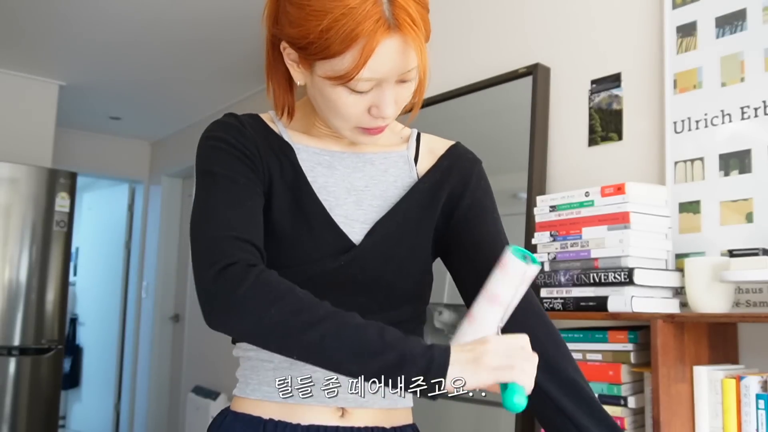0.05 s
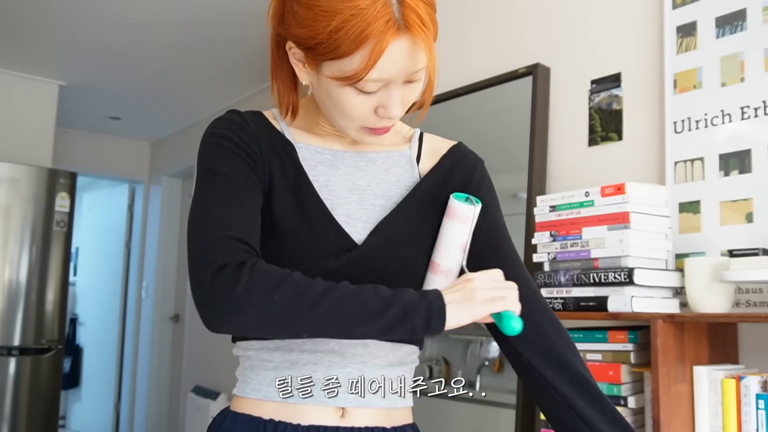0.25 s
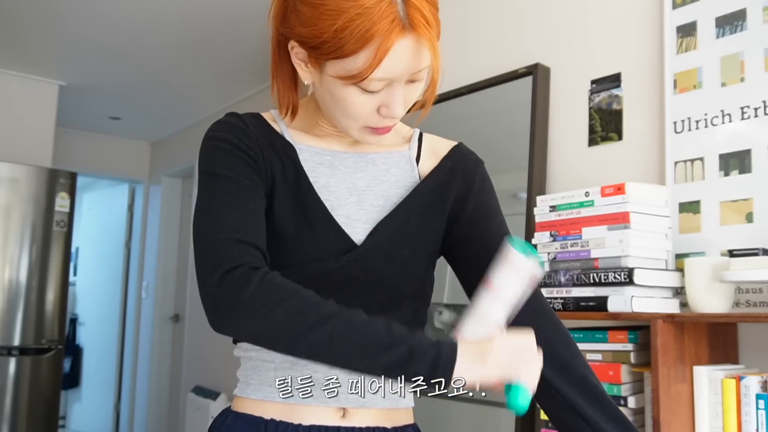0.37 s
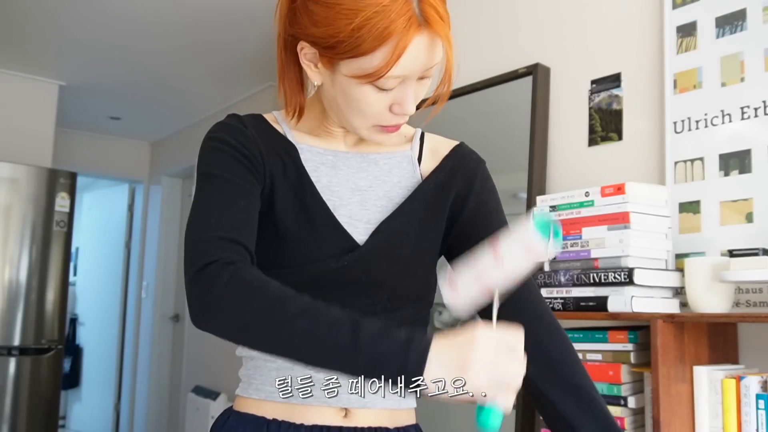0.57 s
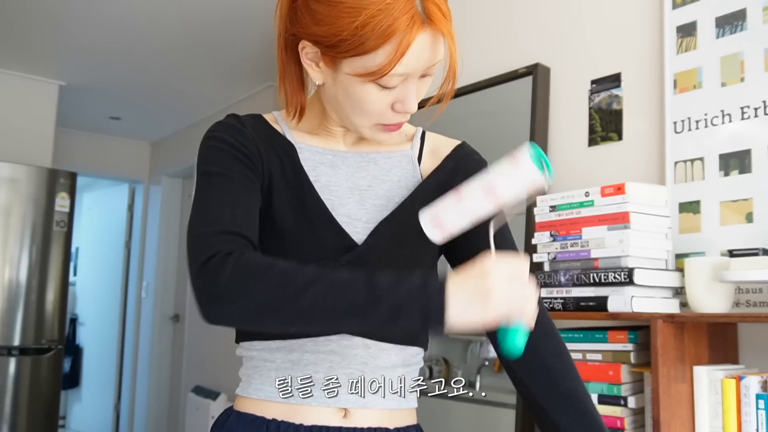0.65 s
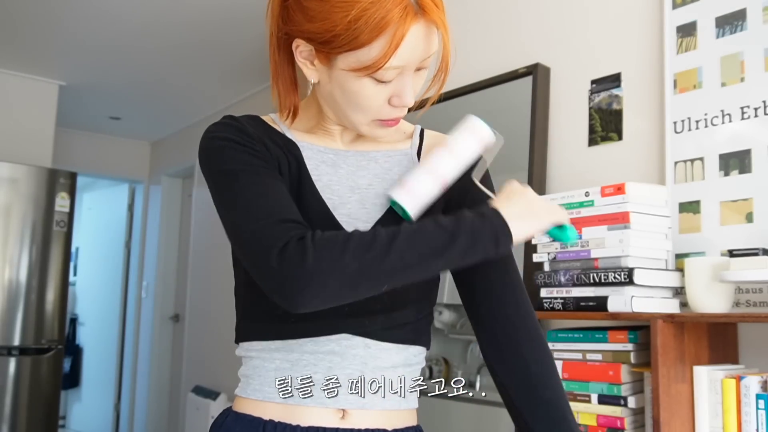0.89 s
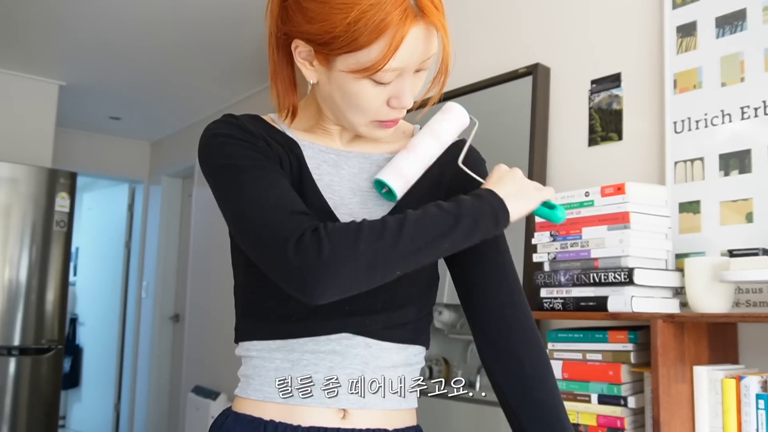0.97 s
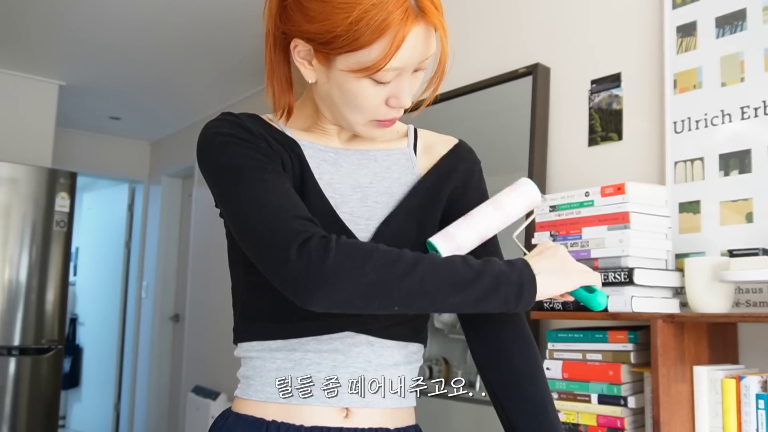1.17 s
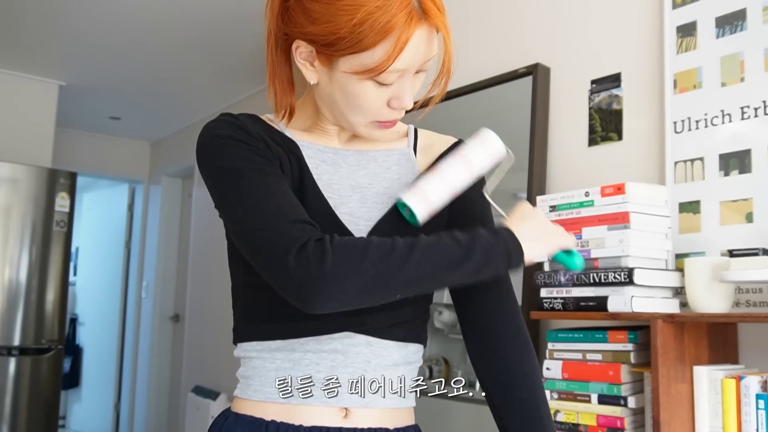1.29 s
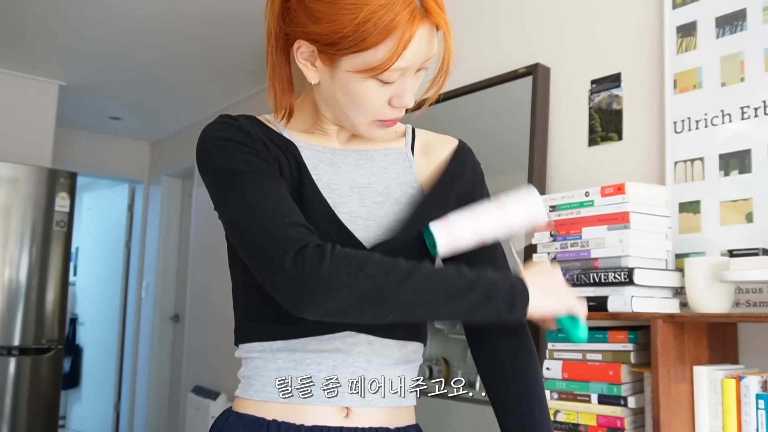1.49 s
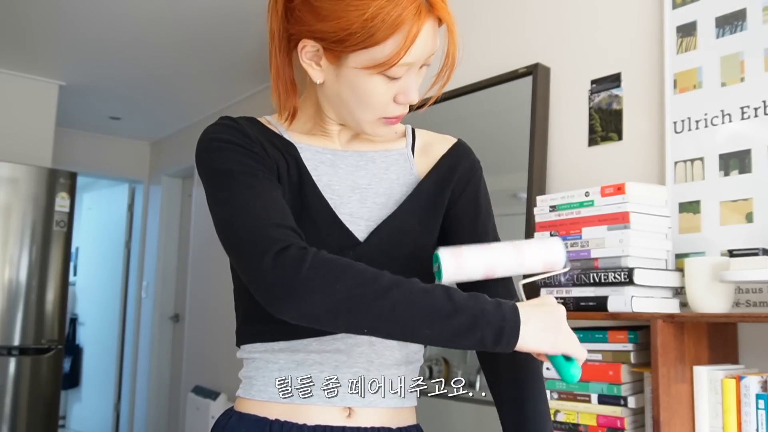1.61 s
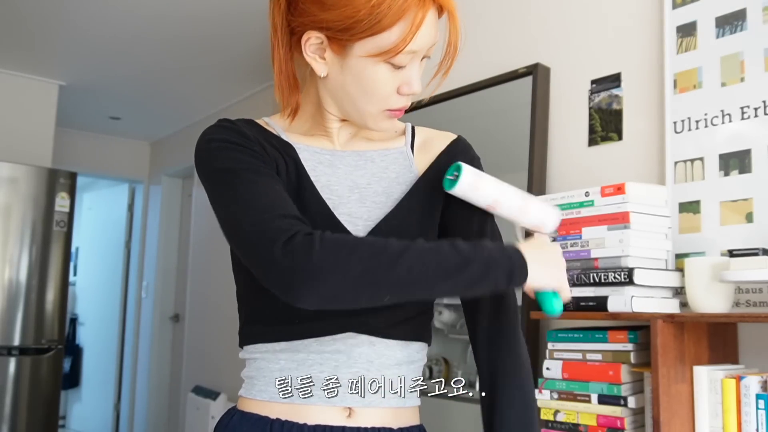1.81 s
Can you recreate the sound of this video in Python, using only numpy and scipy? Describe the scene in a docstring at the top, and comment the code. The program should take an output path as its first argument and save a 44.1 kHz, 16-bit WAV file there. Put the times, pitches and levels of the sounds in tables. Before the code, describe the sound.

A lint roller crackles across fabric in quick, swelling strokes, heard up close in a quiet room. Near the middle its plastic drum clicks, knocks sharply and rattles with high squeaks, then more strokes follow with lighter knocks.

```python
"""In a quiet room, a sticky lint roller is run over a sweater in short strokes.
The glue peels off the cloth in a fine, dense crackle. The hollow plastic drum squeaks on its axle,
knocks against the frame as it lands or lifts, clicks against its end stop,
and rattles while it spins free."""
import sys
import numpy as np
from scipy import signal
from scipy.fft import rfft, irfft
from scipy.io import wavfile
from scipy.ndimage import uniform_filter1d

SR = 44100
rng = np.random.default_rng(int(sys.argv[2]) if len(sys.argv) > 2 else 0)


def pcm_store(signal):
    """Save signal as 16-bit PCM."""
    levels = np.round(np.clip(np.atleast_2d(signal), -1, 1) * 32767)
    wavfile.write(sys.argv[1], SR, levels.astype(np.int16).T)


N = 81585
TIME = np.arange(N) / SR


def amp(db):
    """Turns decibels (dB) into a number to multiply by."""
    return 10 ** (np.asarray(db) / 20)


def unit(x):
    """Scales a sound so that its average strength (rms) is 1."""
    return x / np.sqrt(np.mean(x ** 2) + 1e-20)


def read(points, hz):
    """Reads between the rows of a (frequency, value) table, with octaves evenly spaced."""
    row_hz, value = np.transpose(points)
    return np.interp(np.log(hz + 1), np.log(row_hz + 1), value)


def add(mix, start_s, sound):
    """Adds a sound to the mix at a given time."""
    part = mix[max(round(start_s * SR), 0):][:len(sound)]
    part += sound[:len(part)]


def shelf(x, corner):
    """Rises smoothly from 0 below the corner to 1 above it."""
    return 1 - 1 / (1 + np.square(x / corner) ** 2)


def colour(x, db_at, size=2048):
    """Shapes the tone of a sound; db_at gives the relative level of each frequency."""
    log_gain = np.log(amp(db_at(abs(np.fft.fftfreq(size, 1 / SR)))))
    taps = np.fft.ifft(np.exp(np.conj(signal.hilbert(log_gain)))).real  # never rings ahead of a hit
    return signal.fftconvolve(x, taps / np.linalg.norm(taps))[:len(x)]


def wander(rate_hz):
    """A smooth random wobble, up to about the given rate."""
    keep_slow = 1 - shelf(np.fft.rfftfreq(N, 1 / SR), rate_hz)
    return unit(irfft(rfft(rng.standard_normal(N)) * keep_slow, N))


def clicks(per_s, spread_db):
    """Random clicks, mostly small and a few large."""
    size = amp(spread_db * np.minimum(rng.exponential(1, N), 4))
    return unit(size * rng.choice([-1, 1], N) * (rng.random(N) < per_s / SR))


def room_tone(level_db=-54.5, side_db=-10):
    """A faint steady hush, nearly the same on the left and right."""
    # Each row: frequency in Hz, relative level in dB.
    hush = [(15, -60), (25, -18.5), (107, -10), (152, -4.5), (193, -2.5), (313, -10), (1020, -13.5),
            (1140, -11.5), (1340, -12), (7500, -22), (8350, -23), (9050, -26), (15500, -33)]
    middle, side = (unit(colour(rng.standard_normal(N), lambda hz: read(hush, hz))) for _ in range(2))
    return amp(level_db) * (middle + amp(side_db) * np.array([side, -side]))


def room_echo(x, tail_db=-4.5, build_s=0.0053, size=22050):
    """Sound bounces off nearby surfaces, then dies away in a short blurred tail."""
    # Each row: delay of one bounce in seconds, level in dB.
    bounces = [(.0046, -24.5), (.0056, -20), (.0074, -13), (.0135, -15.5)]
    # Each row: frequency in Hz, seconds the tail takes to fade by 60 dB.
    fade_times = [(250, 0.25), (1700, 0.31), (4600, 0.28), (13000, 0.34)]
    hz, t, noise = signal.stft(rng.standard_normal(size), SR, nperseg=256)
    tail = signal.istft(noise * amp(-60 * t / read(fade_times, hz)[:, None]), SR)[1][:size]
    tail *= np.minimum(np.arange(size) / SR / build_s, 1)
    response = amp(tail_db) * tail / np.linalg.norm(tail)
    for delay, db in bounces:
        add(response, delay, amp([db]))
    return signal.fftconvolve(x, response)[:N]


def spread(x, width, scatter_s=0.027, size=6000):
    """Scattered sound reaches the left and right differently, most of all in the treble."""
    hz = np.fft.rfftfreq(size, 1 / SR)
    scatter = rng.standard_normal(size) * np.exp(-np.arange(size) / SR / scatter_s)
    scatter = irfft(rfft(scatter / np.linalg.norm(scatter)) * amp(read(width, hz)))
    side = signal.fftconvolve(x, scatter)[:N]
    return np.array([x + side, x - side]) * amp([[.25], [-.25]])  # a touch louder on the left


def drum_rattle(level_db=-2, spin_s=0.16):
    """The hollow drum chatters on its axle as it runs down."""
    # Each row: start of a spin in seconds, relative level in dB, steady fade in dB per second.
    spins = [(.474, -41, 98), (.786, -33, 123), (1.348, -42, 106), (0.75, -54, 6), (1.54, -52.5, 83)]
    # Each row: frequency in Hz, relative level of the chatter in dB.
    tone = [(20, -59), (70, -32), (160, -14.5), (300, -13), (700, -10), (1100, -0.5), (1450, 1),
            (1850, 3.5), (2500, -7.5), (3200, -12), (5200, -11.5), (6200, -11.5), (9000, -15), (15500, -37)]
    level = np.zeros(N)
    for start, db, fade in spins:
        age = abs(TIME - start)
        run_down = 1 - shelf(age, spin_s)  # an extra fade that ends the spin
        level += (TIME > start) * amp(db - fade * age) * run_down
    chatter = clicks(per_s=900, spread_db=3) * level
    return amp(level_db) * colour(chatter, lambda hz: read(tone, hz))


def axle_squeaks(edge_s=0.0077, waver_hz=20.1, rough_db=2):
    """The axle sticks and slips, which makes groups of its tones sing in short, unsteady bursts."""
    # Each row: start in seconds, length in seconds, level in dB, which group of tones sings.
    bursts = [(0.444, 0.041, -44.5, "low"), (0.48, 0.053, -38.5, "low"), (0.545, 0.026, -46, "low"),
              (0.573, 0.033, -52, "low"), (0.695, 0.038, -44, "low"), (0.764, 0.055, -32, "low"),
              (0.839, 0.041, -37, "low"), (1.022, 0.034, -50.5, "low"), (1.057, 0.037, -48.5, "low"),
              (1.109, 0.054, -46, "low"), (1.156, 0.038, -35.5, "low"), (1.215, 0.038, -52, "low"),
              (1.405, 0.028, -46.5, "low"), (1.461, 0.067, -52, "low"), (0.391, 0.13, -47.5, "high"),
              (0.501, .012, -38, "high"), (0.52, 0.031, -46, "high"), (0.542, 0.1, -57, "high"),
              (0.675, 0.042, -45.5, "high"), (0.764, 0.052, -38, "high"), (0.831, 0.06, -51, "high"),
              (0.986, 0.043, -51.5, "high"), (1.042, 0.1, -48.5, "high"), (1.131, 0.051, -42, "high"),
              (1.173, 0.074, -59, "high"), (1.399, 0.049, -48, "high"), (1.703, .025, -53.5, "high"),
              (1.724, 0.065, -65, "high"), (1.388, 0.043, -45, "loose")]
    # The axle's three groups of tones. Each row: pitch in Hz, relative level in dB.
    low = [(4534, -13), (4582, 0), (4662, -14), (11585, -25), (13300, -28)]
    high = [(8020, -4), (8187, 0), (8110, -11), (13440, -20), (15700, -28)]
    loose = [(3890, 0), (6713, -5), (11550, -16), (13460, -18)]
    out = np.zeros(N)
    for name, tones in (("low", low), ("high", high), ("loose", loose)):
        level = sum(amp(db) * np.clip(np.minimum(TIME - start, start + length - TIME) / edge_s, 0, 1)
                    for start, length, db, group in bursts if group == name)
        squeal = np.zeros(N)
        for hz, db in tones:
            pitch = hz + waver_hz * wander(rate_hz=84)
            squeal += amp(db) * np.sin(2 * np.pi * np.cumsum(pitch) / SR)
        out += level * unit(squeal * amp(rough_db * wander(rate_hz=170)))
    return out


def plastic_hits(hits, tone, ring_tones, crack_db, ring_db, crack_s=0.0017, size=6000):
    """Plastic hits plastic: a sharp crack and a short ring."""
    bass_hz, treble_hz = 1300, 3350
    t, crack_hz = np.arange(size) / SR, np.fft.rfftfreq(size, 1 / SR)
    ring = sum(amp(db - 60 * t / fade_s) * np.sin(2 * np.pi * hz * t) for hz, db, fade_s in ring_tones)
    out = np.zeros(N)
    for start, db, bass_db, treble_db in hits:
        burst = rng.standard_normal(size) * np.exp(-t / crack_s)
        crack = (t == 0) + amp(crack_db) * burst / np.linalg.norm(burst)
        # Even out the chance peaks and dips in the crack's tone.
        uneven_db = 10 * np.log10(uniform_filter1d(abs(rfft(crack)) ** 2, size=60))
        crack = colour(crack, lambda hz: -np.interp(hz, crack_hz, uneven_db))
        hit = colour(unit(crack) + amp(ring_db) * unit(ring),
                     lambda hz: read(tone, hz) + bass_db * (1 - shelf(hz, bass_hz))
                     + treble_db * shelf(hz, treble_hz))
        add(out, start, amp(db) * hit / np.linalg.norm(hit))
    return out


def drum_knocks():
    """The hollow drum knocks against the frame as it lands or lifts."""
    # Each row: start in seconds, strength in dB, bass boost in dB, treble boost in dB.
    knocks = [(.228, -42, 7, -12), (.325, -16.5, -8, -19), (.458, -28, 10, -9.5), (.473, -10, 0, 0.5),
              (.501, -17.5, -13, -11), (.585, -21.5, -1, -4), (.7766, 3, 4.5, 7), (.782, -26, -10, 10),
              (1.3455, -11.5, 5.5, 0)]
    # Each row: frequency in Hz, relative level of a knock in dB.
    tone = [(20, -55), (80, -41), (160, -4), (300, -6), (550, 0.5), (1050, 1), (1900, 3.5), (3100, 3),
            (4000, -3), (5300, -6), (6200, -1.5), (7200, -10.5), (10000, -12.5), (15500, -31)]
    # How the drum rings. Each row: pitch in Hz, relative level in dB, seconds to fade by 60 dB.
    drum_ring = [(498, -11.5, 0.096), (800, -5, 0.028), (1070, -13, 0.047), (1290, -2, 0.066),
                 (1876, 0.5, 0.037), (2130, -8, 0.057), (2976, 0.5, 0.023), (3214, 4, 0.019),
                 (6190, 5, 0.01)]
    return plastic_hits(knocks, tone, drum_ring, crack_db=5, ring_db=-8)


def end_stop_clicks():
    """The drum slides against its end stop with a sharp click that rings the end cap."""
    # Each row: start in seconds, strength in dB, bass boost in dB, treble boost in dB.
    taps = [(.6623, 1.5, -4.5, 2.5), (.6675, -8, 0.5, 4.5), (1.8328, -13, 2.5, 4.5), (1.8378, -13.5, -5, 1)]
    # Each row: frequency in Hz, relative level of a click in dB.
    tone = [(20, -56), (90, -49), (200, -13), (400, -11), (700, -18), (1400, -6.5), (2100, -8.5),
            (2650, 1.5), (3100, -6.5), (3900, -1), (5500, -5), (7000, -11.5), (9000, -20), (15500, -44)]
    # How the cap rings. Each row: pitch in Hz, relative level in dB, seconds to fade by 60 dB.
    cap_ring = [(1450, -12, 0.055), (2655, 2, 0.017), (3540, 0, .018), (3900, -1.5, 0.013), (4450, 0, 0.01),
                (5490, -2, 0.043)]
    return plastic_hits(taps, tone, cap_ring, crack_db=3.5, ring_db=-10)


def sticky_peel(fizz_db=-2, clump_db=0.63, stroke_shape=2.77, treble_hz=8900):
    """Fibres snap off the glue; each stroke swells and fades, and has its own brightness."""
    # Each row: a stroke's fastest moment in seconds, seconds to rise 10 dB, seconds to fall 10 dB,
    # level in dB, treble boost in dB.
    strokes = [(0.064, 0.07, 0.098, -44, 7), (0.241, 0.055, .065, -40.5, 5),
               (0.433, 0.078, 0.11, -39.5, 6.5), (0.699, 0.049, 0.13, -46, -12),
               (.975, 0.081, 0.056, -50.5, 5), (1.095, 0.053, 0.034, -46, 0),
               (1.167, 0.033, 0.043, -39.5, 11.5), (1.314, 0.038, 0.12, -47, 2.5),
               (1.405, .02, 0.022, -54.5, 6), (1.519, 0.017, 0.015, -36.5, 18),
               (1.575, 0.1, 0.059, -42, 5.5), (1.663, 0.034, 0.044, -47, 5.5)]
    # Each row: frequency in Hz, relative level of the crackle in dB.
    tone = [(30, -50), (130, -46), (250, -6), (700, -12.5), (1200, -6), (2200, -2), (3200, 0), (4700, 2),
            (5600, -3), (7200, -5), (10000, -13), (15500, -24.5)]
    out = np.zeros(N)
    for peak, rise, fall, db, treble_db in strokes:
        from_peak = np.maximum((peak - TIME) / rise, (TIME - peak) / fall)
        snaps = unit(clicks(per_s=4000, spread_db=2.5) + amp(fizz_db) * rng.standard_normal(N))
        level = amp(db - 10 * from_peak ** stroke_shape + clump_db * wander(rate_hz=59))
        out += colour(snaps * level, lambda hz: read(tone, hz) + treble_db * shelf(hz, treble_hz))
    return out


def scene():
    """Mixes the cloth, the plastic parts, their echoes and the hush of the room in stereo."""
    # How wide each sounds. Each row: frequency in Hz, level of the sides against the middle in dB.
    cloth_width = [(300, -13), (1000, -11), (2200, -46), (4100, -50), (5500, -13), (8000, -7.5),
                   (14000, -4.5)]
    plastic_width = [(100, -20), (1000, -16.5), (2200, -24), (4000, -12), (6000, -8), (8000, -6),
                     (14000, -4)]
    peel = amp(-0.03) * sticky_peel()
    axle = axle_squeaks()
    drum = drum_rattle() + drum_knocks() + end_stop_clicks()
    plastic = drum + axle + room_echo(drum + amp(-0.5) * axle)
    cloth = peel + amp(-4.5) * room_echo(peel)
    return spread(cloth, cloth_width) + spread(plastic, plastic_width) + room_tone()


def record(dry):
    """Cuts away the very highest treble."""
    top_hz = 15790
    low_pass = signal.firwin(1023, top_hz, window=("kaiser", 9), fs=SR)
    return signal.oaconvolve(dry, low_pass[None], "same")


dry = scene()
out = record(dry)
pcm_store(out)
```